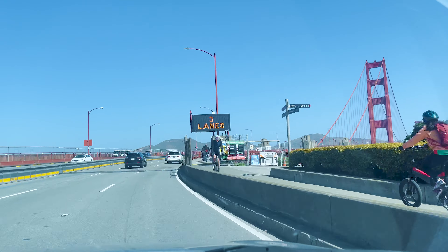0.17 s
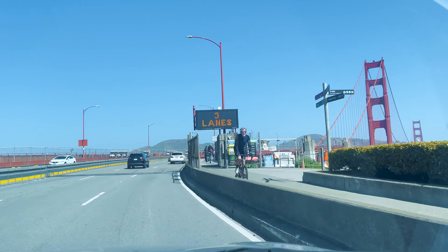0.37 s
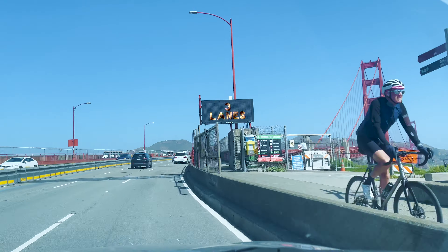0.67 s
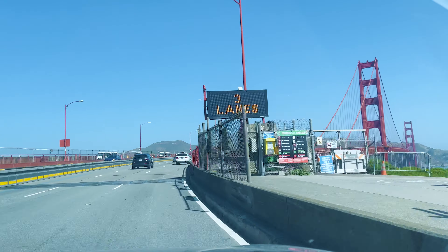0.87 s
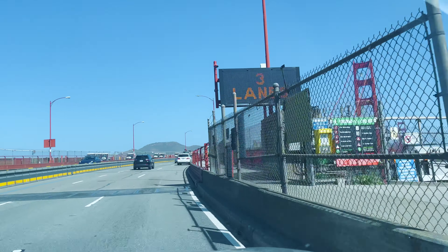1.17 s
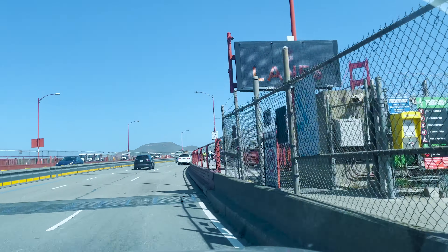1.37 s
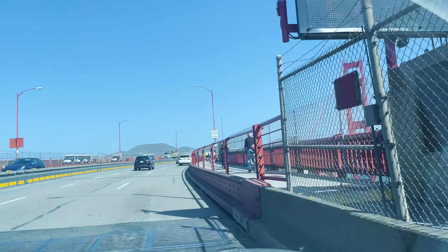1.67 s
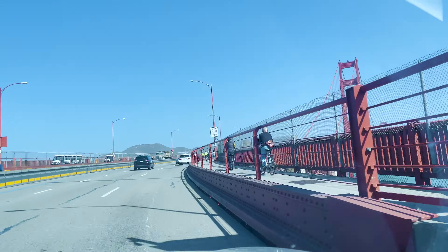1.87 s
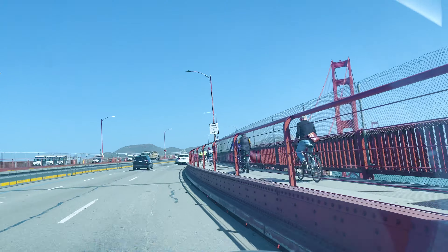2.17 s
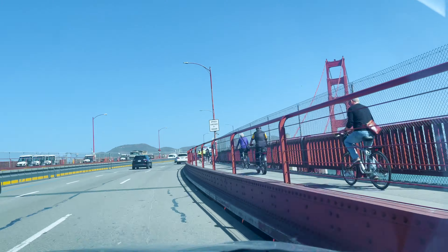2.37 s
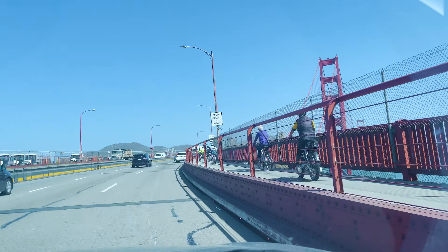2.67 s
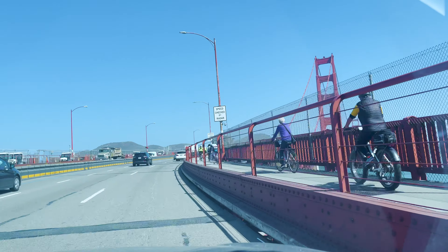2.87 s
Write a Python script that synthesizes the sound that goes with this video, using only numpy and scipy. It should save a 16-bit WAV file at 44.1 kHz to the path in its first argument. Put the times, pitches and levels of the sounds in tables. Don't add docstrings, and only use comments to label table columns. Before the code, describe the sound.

Car interior road rumble, jolted by a heavy expansion-joint thump, then sharp plastic knocks and rattling trim

```python
import sys
import numpy as np
from scipy import signal
from scipy.fft import rfft, irfft
from scipy.io import wavfile
from scipy.ndimage import uniform_filter1d, minimum_filter1d

SR = 44100
rng = np.random.default_rng(int(sys.argv[2]) if len(sys.argv) > 2 else 0)


def gain_from_db(level_db):
    decades = np.asarray(level_db, float) / 20
    return 10 ** decades


def put_to_file(sound):
    columns = np.atleast_2d(sound).T
    safe = np.clip(columns, -1, 1)
    whole_steps = np.round(safe * 32767)
    wavfile.write(sys.argv[1], SR, whole_steps.astype(np.int16))


N = 133623
T = np.arange(N) / SR
HZ = np.fft.rfftfreq(N, 1 / SR)

# (time [s], shell level [dB], tick level [dB], treble boost [dB])
KNOCKS = [(.758, -51, -52, 14.5), (1.034, -41, -60, 11), (1.137, -30.5, -69, -10), (1.316, -27, -44, -5.5),
          (1.501, -28.5, -43, -5), (1.633, -50, -44, 1.5), (1.9365, -28.5, -36, 8), (1.9605, -38.5, -44, 3),
          (2.099, -32, -41, 10), (2.2101, -9, -17, 4.5), (2.234, -40, -43.5, 7), (2.3832, -5.5, -6.5, 2.5),
          (2.4154, -31.5, -47.5, -13), (2.5859, -15.5, -23, 0)]
# (frequency [Hz], level [dB])
TICK_COLOUR = [(1100, -19), (2100, -4), (3000, -0.5), (5000, -5.5), (6500, -9), (8000, -10.5), (10200, -4),
               (11700, -4.5)]
# (frequency [Hz], left over right [dB])
TICK_LEAN = [(1200, -6), (2800, 6.5), (4200, 8), (6500, 5), (9000, 0)]
# (frequency [Hz], level [dB], T60 [s])
TRIM_RING = [(8510, -12, 0.015), (9000, -13.5, 0.013), (9910, -5, 0.0098), (11045, -9.5, 0.012),
             (10920, -12, 0.0093), (11800, -10, 0.011)]
# (delay [s], left level [dB], right level [dB])
SNAP_ECHOES = [(.0016, -11, -21), (.0025, -10, -17), (.0035, -8, -15), (.0046, -11, -12), (.0062, -13, -14),
               (.0078, -14, -22.5)]
# (time [s], thud level [dB], slap level [dB], T60 [s], panel ring [Hz])
BUMPS = [
    (0.774, -36.5, -42.5, 0.11, 400),
    (1.437, -26, -37, 0.5, 415.5),
    (1.494, -25.5, -35, 0.066, 431),
    (1.558, -25.5, -32, 0.32, 443),
    (1.919, -8.5, -28, 0.22, 429.6),
    (1.958, -4, -30, 0.16, 335),
    (2.078, -22.5, -31, 0.17, 303),
    (2.126, -18.5, -40, 0.9, 356.8),
]
# (frequency [Hz], width [Hz], level [dB])
BODY_MODES = [(75, 23, 7.5), (149, 150, -3), (335, 69, -2.5), (471.3, 15, -7)]
# (frequency [Hz], level [dB])
SLAP_COLOUR = [(300, -9.5), (600, 7), (1000, 2.5), (2200, -6), (3500, -16.5), (5000, -29.5), (9000, -48)]
# (start [s], rise [s], fall [s], thin hiss level [dB], wide rustle level [dB])
FIZZ = [(0.031, 0.045, 0.065, -81, -95), (0.359, 0.17, 0.63, -61, -67), (1.2, 0.14, 0.29, -66.5, -75.5),
        (1.6, 0.037, 0.31, -77, -74), (1.93, 0.011, 0.052, -42.5, -43.5),
        (1.955, 0.0074, 0.085, -57, -51.5), (2.0, 0.031, 0.068, -57, -55), (2.06, 0.04, 0.12, -54.5, -50.5),
        (2.15, 0.05, 0.11, -70, -58), (2.24, 0.022, 0.43, -62, -59.5), (2.6, 0.06, 0.44, -69, -74)]
# (frequency [Hz], level [dB])
HISS_COLOUR = [(8800, -15.5), (9300, -5.5), (10200, -9), (10800, 0), (11500, -8.5), (12000, -39)]
# (frequency [Hz], level [dB])
RUSTLE_COLOUR = [(2500, -3), (4500, 2.5), (7000, -0.5), (8600, 2.5), (10000, -7), (11700, 4), (12500, -35)]
# (time [s], pitch [Hz], level [dB])
BOOM = [(0.03, 41.97, -18.5), (0.2, 39.28, -38), (0.34, 44.46, -24), (0.87, 46.58, -23),
        (1.25, 45.85, -24.5), (1.36, 38.86, -47), (1.54, 40.68, -24), (1.96, 57.13, -18.5),
        (2.07, 58.57, -22.5), (2.2, 50, -18.5), (2.37, 48.1, -22), (2.48, 45.1, -37), (3.0, 43.2, -25)]
# (time [s], pitch [Hz], level [dB])
FLOOR_PAN = [(.03, 86.18, -26), (.53, 96.94, -33.5), (.72, 89.8, -21.5), (.86, 98.25, -28),
             (1.32, 87.35, -34.5), (1.55, 95.2, -20.5), (1.75, 94.97, -26), (1.91, 96.6, -29.5),
             (1.94, 96.96, -11), (2.04, 98, -28), (2.13, 83.34, -32), (2.2, 89.37, -16),
             (2.37, 85.34, -25.5), (2.7, 99.74, -19), (3, 91.9, -19)]
# (time [s], level [dB])
ROUGHNESS = [(0, -31.5), (.58, -29.5), (1.49, -29), (1.91, -30.5), (1.93, -14.5), (2.03, -17),
             (2.06, -20.5), (2.09, -16), (2.45, -20), (3, -18.5)]
# (frequency [Hz], level [dB per Hz])
RUMBLE_COLOUR = [(30, -15.5), (55, 0.5), (98, 0.5), (184, -7), (255, -10), (290, -16.5), (420, -19.5),
                 (520, -25)]
# (frequency [Hz], level [dB per Hz])
ROAR_COLOUR = [(400, 5.5), (560, -9), (1000, -4), (1350, -9.5), (1600, -17), (3600, -31), (4600, -39.5),
               (8000, -56)]
# (frequency [Hz], width [Hz], level over roughness [dB])
HUMS = [(175.8, 16, -7), (233.7, 4.65, -10), (324, 32, -21.5), (377.2, 36, -14), (966, 46, -31),
        (1197, 89, -29.5)]
# (frequency [Hz], correlation [-1..1])
LIKENESS = [(40, 1), (130, 0.94), (270, 0.86), (580, 0.0068), (1240, 0.0), (2640, 0.27), (5630, 0.29),
            (9000, .9)]
# (frequency [Hz], left over right [dB])
BALANCE = [(40, 0), (170, -1.9), (500, 2), (1440, 0), (4160, 4), (9000, 1)]
# (frequency [Hz], phase by which left leads [rad])
PORT_PHASE = [(0, 0), (8800, -.1), (9500, -2.6), (10400, -3.4), (11900, -6.2), (20000, -6.3)]
SIDES = np.array([[1], [-1]])


def evened(x):
    return x / np.sqrt(np.mean(x ** 2) + 1e-20)


def read(points, hz):
    f, value = np.transpose(points)
    return np.interp(np.log(hz + 1), np.log(f + 1), value)


def add(mix, s, sound):
    part = mix[..., round(s * SR):][..., :sound.shape[-1]]
    part += sound[..., :part.shape[-1]]


def slow(rate):
    return evened(irfft(rfft(rng.standard_normal(N)) * np.exp(-(HZ / rate) ** 2), N))


def peak(hz, width):
    return 1 / (1 + ((HZ - hz) / (width / 2)) ** 2)


def diffuse(gain, extra=0.):
    a, b = rfft(rng.standard_normal((2, N)))
    same = np.clip(read(LIKENESS, HZ) + extra, -1, 1)
    lean = gain_from_db(read(BALANCE, HZ) / 2)
    alike = np.sqrt((1 + same) / 2) * a
    other = np.sqrt((1 - same) / 2) * b
    return evened(irfft(gain * np.array([(alike + other) * lean, (alike - other) / lean]), N))


def hard_snap(t, hz, colour, bite_s):
    click = irfft(colour * np.exp(-2j * np.pi * hz * bite_s), len(t)) * (t < 3 * bite_s)
    click = gain_from_db(5) * click / abs(click).max()
    echoes = sum(gain_from_db(np.array([[left_db], [right_db]])) * np.exp(-2j * np.pi * hz * s)
                 for s, left_db, right_db in SNAP_ECHOES)
    dull = 1 / (1 + ((hz - 2900) / 1700) ** 4)
    return click + irfft(rfft(click) * echoes * dull, len(t))


def hollow_shell(t, bite_s):
    shell_hz, glide, glide_s = 690, 2.0, .00075
    hold_s, release_s, linger_db, linger_t60 = .0036, .0015, -16, .03
    u = np.maximum(t - bite_s, 0)
    settling = u + glide * glide_s * (1 - np.exp(-u / glide_s))
    near = np.minimum(t / bite_s, 1) ** 4 * np.cos(2 * np.pi * shell_hz * settling)
    far = gain_from_db(0.5) * np.minimum(u / .0026, 1) * np.cos(2 * np.pi * (shell_hz * u + .23))
    fade = np.exp(-(np.maximum(u - hold_s, 0) / release_s) ** 2) + gain_from_db(linger_db - 60 * u / linger_t60)
    return fade * np.array([near, far])


def knocks():
    bite_s, port_lag_s = .0005, .000004
    crack_db, crack_t60, tail_db, tail_t60 = -6, .003, -18, .04
    out, t = np.zeros((2, N)), T[:4000]
    hz = np.fft.rfftfreq(len(t), 1 / SR)
    colour = gain_from_db(read(TICK_COLOUR, hz)) / (1 + (900 / (hz + 1)) ** 6)
    colour = colour * gain_from_db(-27 / (1 + (12300 / (hz + 1)) ** 40)) / (1 + (hz / 16300) ** 40)
    snap, shell = hard_snap(t, hz, colour, bite_s), hollow_shell(t, bite_s)
    ring = sum(gain_from_db(db - 60 * t / t60) * np.sin(2 * np.pi * f * t) for f, db, t60 in TRIM_RING)
    crack_fade = gain_from_db(crack_db - 60 * np.maximum(t - 2 * bite_s, 0) / crack_t60)
    tail_fade = gain_from_db(tail_db - 60 * t / tail_t60)
    shared = rng.standard_normal((3, len(t)))
    for s, shell_db, tick_db, treble_db in KNOCKS:
        own = rng.standard_normal((3, len(t)))
        grit = evened(irfft(rfft(shared + .8 * own) * colour, len(t)))
        crack = crack_fade * (grit[0] + 0.13 * grit[2] * SIDES)
        tick = snap + (crack + ring) * np.minimum(t / bite_s, 1)
        tail = tail_fade * (0.71 * grit[1] + 0.29 * grit[2] * SIDES)
        treble = treble_db / (1 + (7000 / (hz + 1)) ** 8)
        tone = gain_from_db(tick_db + treble + SIDES * read(TICK_LEAN, hz) / 2)
        tone = tone * np.exp(1j * np.pi * hz * port_lag_s * SIDES)
        add(out, s, irfft(rfft(tick + tail) * tone, len(t)) + gain_from_db(shell_db) * shell)
    return out


def bumps():
    panel_db, panel_rise_s, drop_db, drop_hz = -2, 0.021, -4, 100.2
    thud, slap, panel = np.zeros(N), np.zeros(N), np.zeros(N)
    t = T[:SR // 2]
    for s, thud_db, slap_db, t60, hz in BUMPS:
        shake = np.minimum(t / 0.013, 1) * gain_from_db(thud_db - 60 * t / t60)
        swell = np.minimum(t / panel_rise_s, 1)
        add(thud, s, shake)
        add(panel, s, gain_from_db(panel_db) * shake * swell * np.sin(2 * np.pi * hz * t))
        add(panel, s, gain_from_db(drop_db) * shake * np.sin(2 * np.pi * drop_hz * t))
        add(slap, s, np.minimum(t / 0.0068, 1) * gain_from_db(slap_db - 60 * t / (1.23 * t60)))
    body = sum(gain_from_db(db) * peak(f, w) for f, w, db in BODY_MODES) / (1 + (HZ / 600) ** 4)
    tread = gain_from_db(read(SLAP_COLOUR, HZ)) * (HZ > 250) * (HZ < 12400)
    panels = np.array([panel, np.roll(panel, 14)])
    return thud * diffuse(body) + panels + slap * diffuse(tread)


def fizz():
    thin, wide = gain_from_db(-87.5) * np.ones(N), np.zeros(N)
    for s, rise, fall, thin_db, wide_db in FIZZ:
        u = np.maximum(T - s - rise, 0) / fall
        swell = np.clip((T - s) / rise, 0, 1) * np.exp(-1.5 * u - 6 * u ** 4)
        thin += gain_from_db(thin_db) * swell
        wide += gain_from_db(wide_db) * swell
    hiss = diffuse(gain_from_db(read(HISS_COLOUR, HZ)) * (HZ > 8500) * (HZ < 12300))
    rustle = diffuse(gain_from_db(read(RUSTLE_COLOUR, HZ)) * (HZ > 2000) * (HZ < 12500), extra=0.22)
    return thin * gain_from_db(1.2 * slow(60)) * hiss + wide * gain_from_db(2 * slow(51)) * rustle


def drone(curve, wobble, flutter_db, rate):
    s, hz, db = np.transpose(curve)
    turns = np.cumsum(np.interp(T, s, hz) * (1 + wobble * slow(rate))) / SR
    level = gain_from_db(np.interp(T, s, db) + flutter_db * slow(rate))
    return np.sqrt(2) * level * np.cos(2 * np.pi * turns)


def cabin_boom():
    return drone(BOOM, 0.052, 0.75, 9.7)


def floor_drumming():
    return drone(FLOOR_PAN, 0.035, 1.7, 12.84) * gain_from_db(-.6 * SIDES)


def road():
    rough_db = np.interp(T, *np.transpose(ROUGHNESS))
    band = 1 / (1 + (HZ / 620) ** 8) / (1 + (24 / (HZ + 1)) ** 8)
    low = gain_from_db(5) * diffuse(gain_from_db(read(RUMBLE_COLOUR, HZ)) * band) * gain_from_db(1.4 * slow(59))
    for hz, width, db in HUMS:
        low = low + gain_from_db(db + 4.08 * slow(11.8)) * diffuse(peak(hz, 1.27 * width) ** 2)
    sway = gain_from_db(-28) * diffuse(peak(41, 80) ** 2)
    edge = 1 / (1 + (380 / (HZ + 1)) ** 8) / (1 + (HZ / 12400) ** 60)
    roar = diffuse(gain_from_db(read(ROAR_COLOUR, HZ)) * edge) * gain_from_db(0.72 * slow(24) + 1.2 * slow(80))
    roar_db = -36.5 + 0.14 * (rough_db + 6.5) + 4 * np.sin(np.pi * T / 3.3)
    return sway + gain_from_db(rough_db) * low + gain_from_db(roar_db) * roar


def scene():
    return knocks() + bumps() + fizz() + cabin_boom() + floor_drumming() + road()


def low_pass(x):
    return signal.sosfilt(signal.butter(12, 16700, fs=SR, output="sos"), x)


def record(dry):
    turn = np.exp(.5j * read(PORT_PHASE, HZ) * SIDES)
    ported = irfft(rfft(dry) * turn, N)
    room = np.minimum(.93 / (abs(ported).max(0) + 1e-9), 1)
    duck = uniform_filter1d(minimum_filter1d(room, size=401), size=401)
    return low_pass(ported * duck)


dry = scene()
out = record(dry)
put_to_file(out)
```